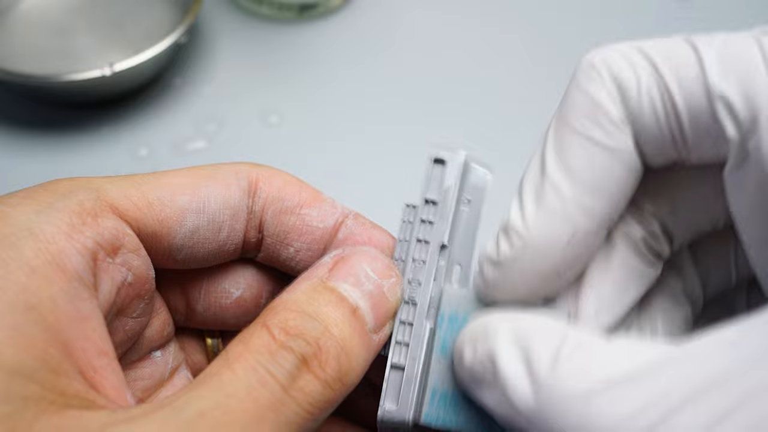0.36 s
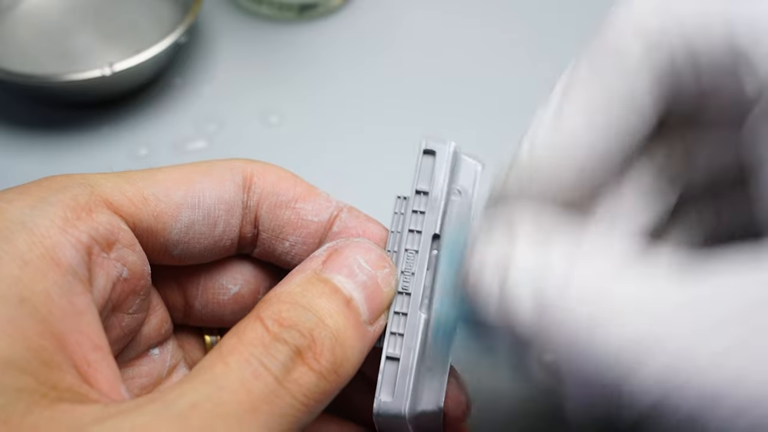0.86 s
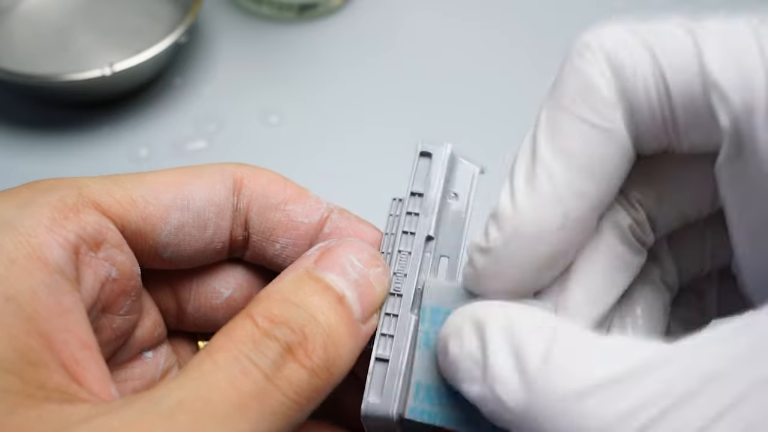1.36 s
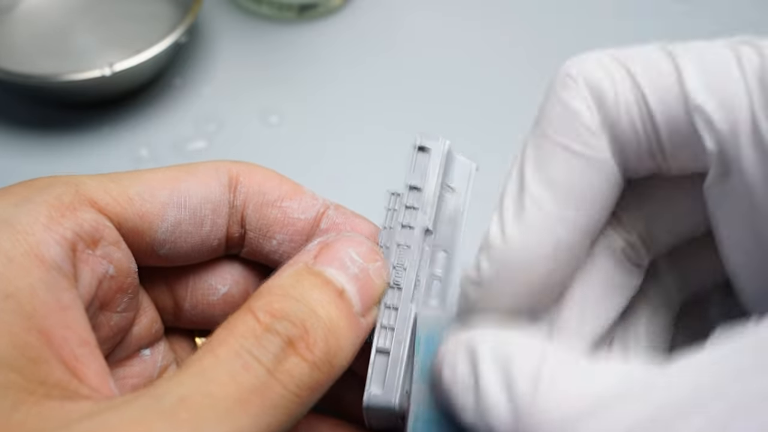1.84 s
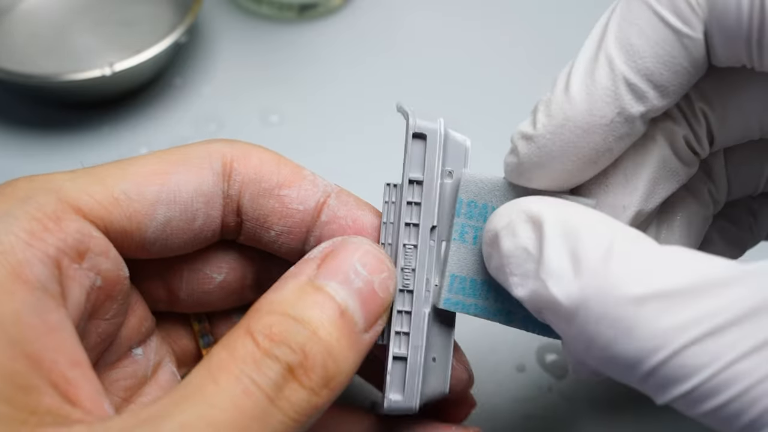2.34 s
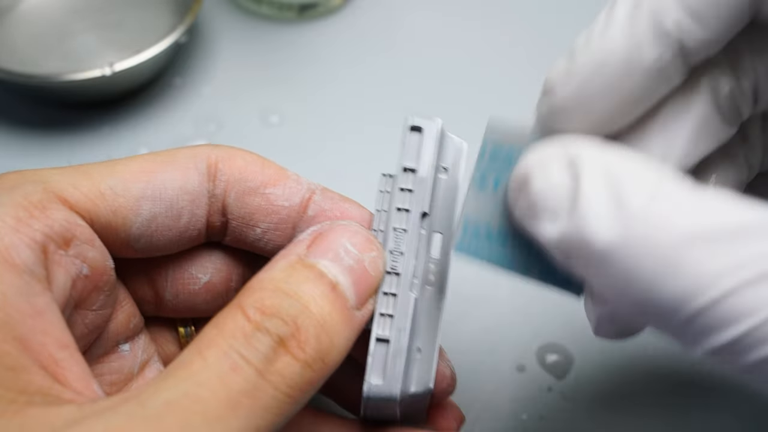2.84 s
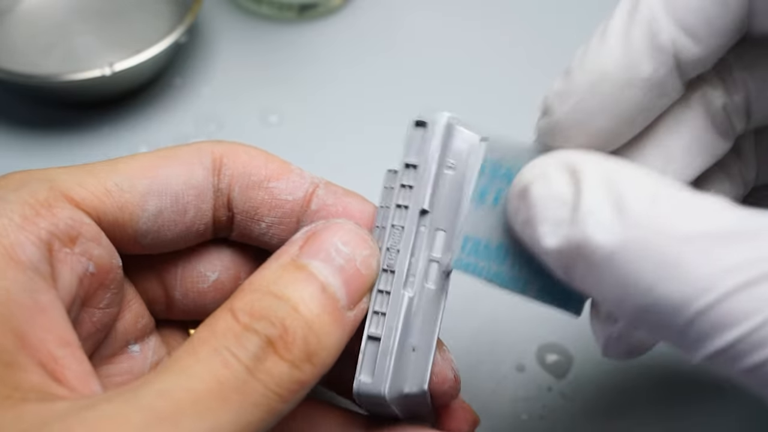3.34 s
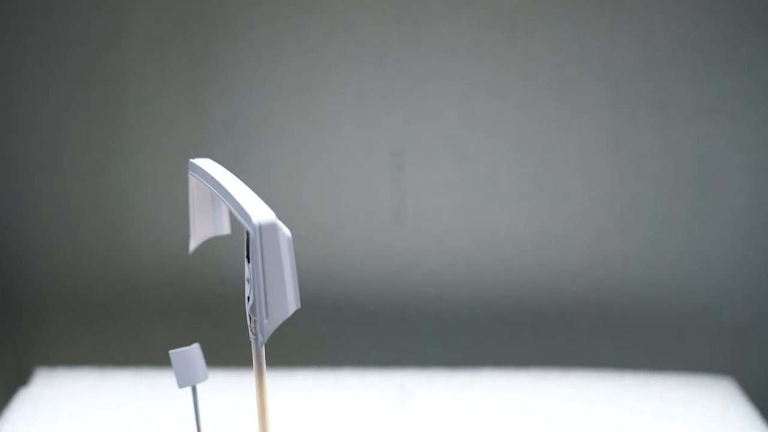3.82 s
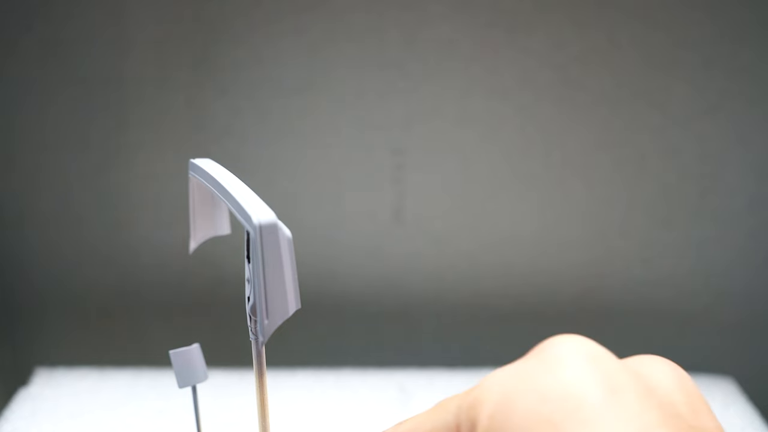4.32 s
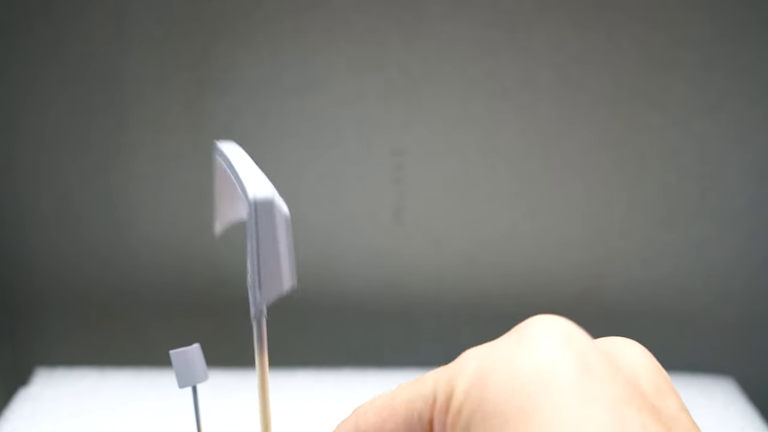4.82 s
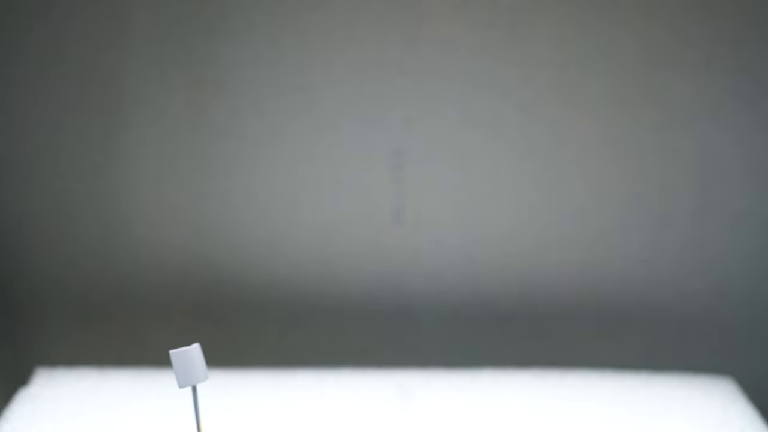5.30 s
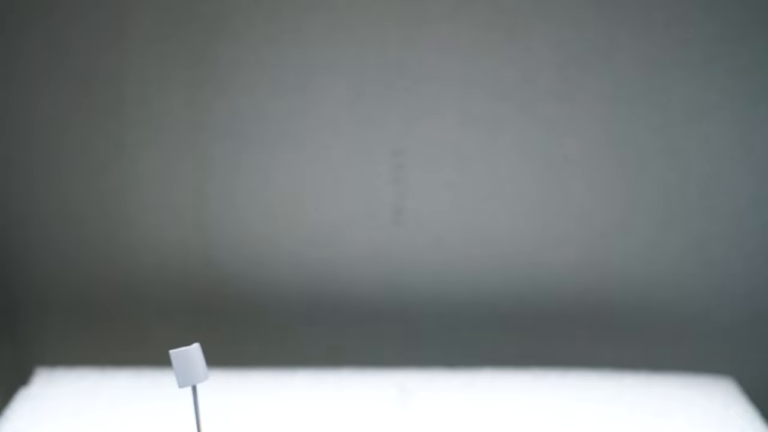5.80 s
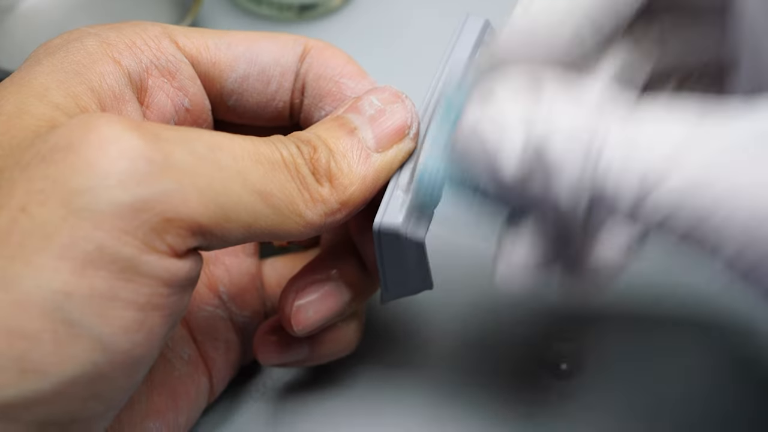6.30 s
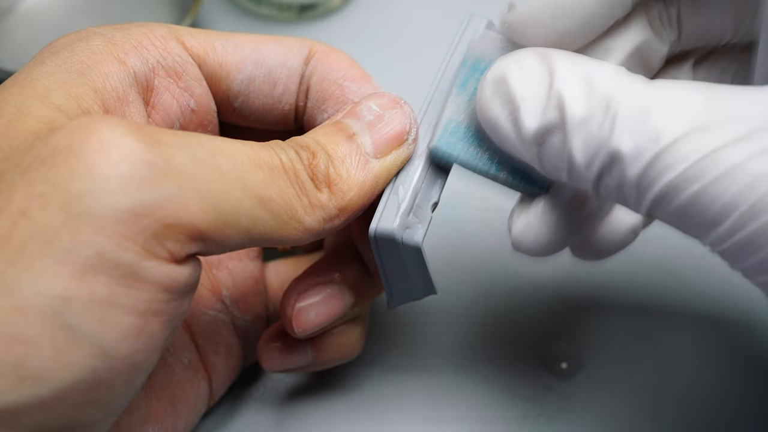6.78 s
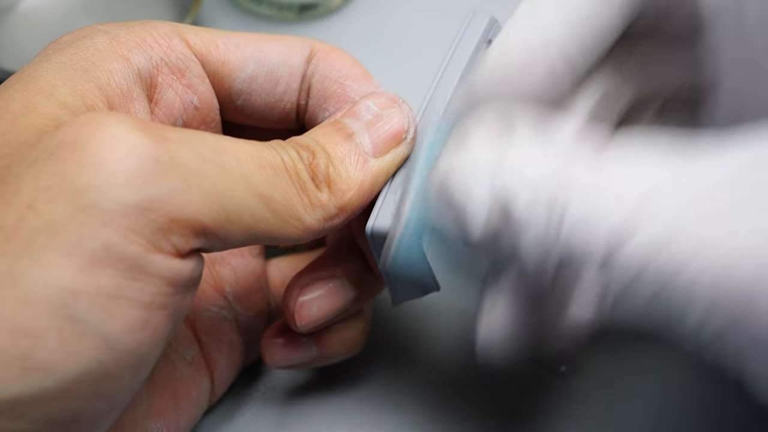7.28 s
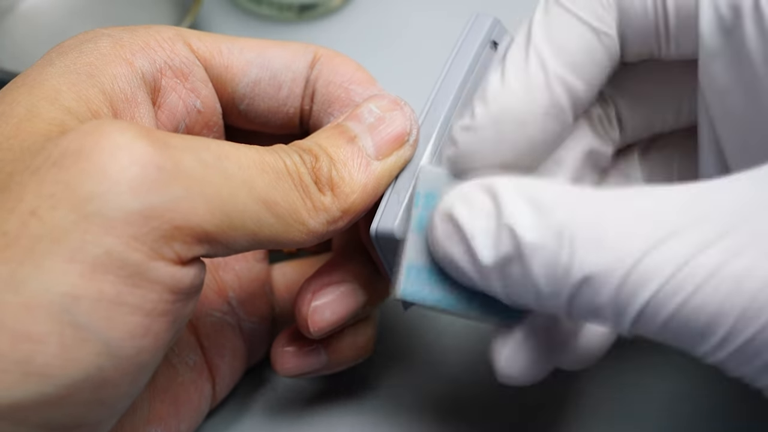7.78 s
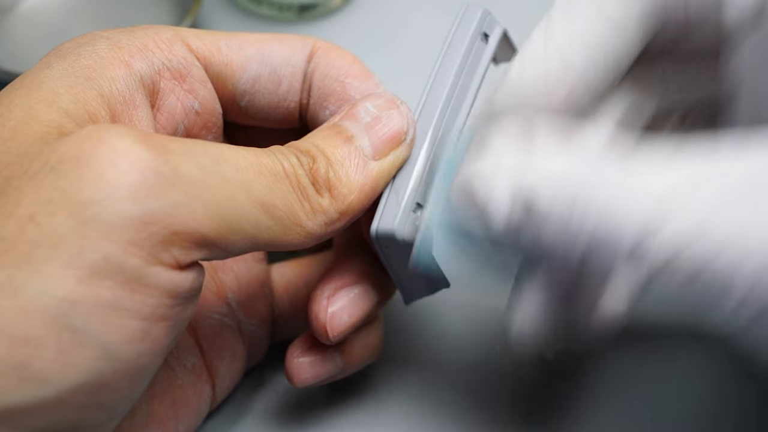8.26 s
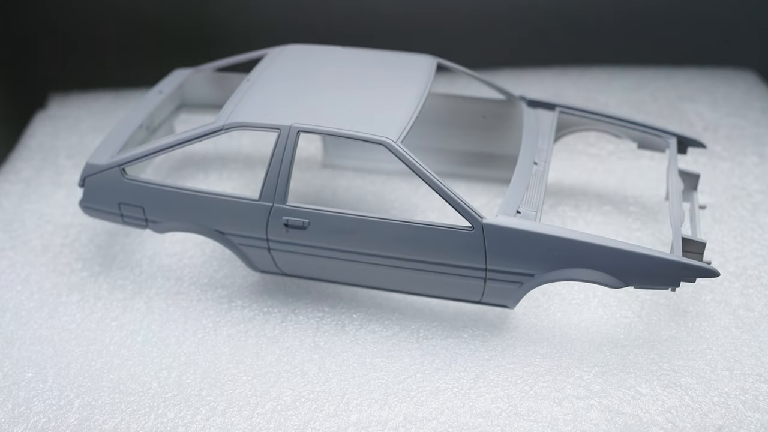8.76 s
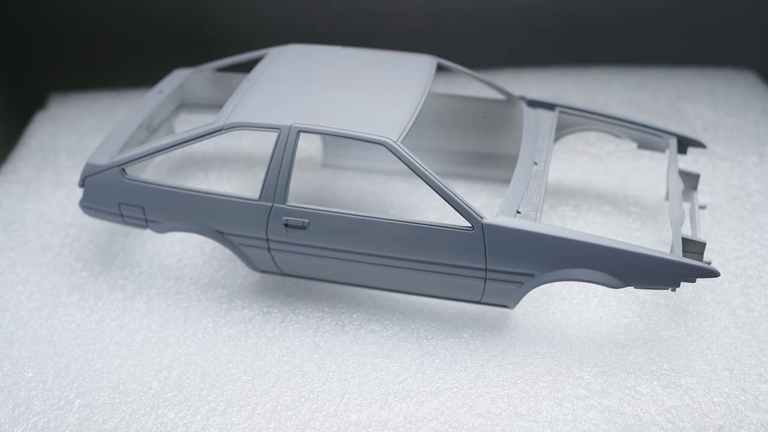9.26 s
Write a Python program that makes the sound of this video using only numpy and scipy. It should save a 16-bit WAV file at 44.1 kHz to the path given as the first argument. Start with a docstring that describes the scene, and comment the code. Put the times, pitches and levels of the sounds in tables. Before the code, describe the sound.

A quiet room with low rumble, wavering hum, distant rush and soft microphone hiss. From 0 to about 2 seconds a pad sands a small hollow plastic part close by, a little left: short, dry, bright rasps, several per second, with a papery hollow tone and small cracks where it snags. Around 2.2 there is a pause with glove rustle, then sparser strokes and sharp snags until 3.4; a faint scuff near 3.8. From 4.35 a stick scrapes and creaks in foam in short pulls, and at 4.8 to 4.95 it slips free in a burst of ringing snaps and chatter. Near quiet until 6.1. Then sanding resumes, louder and quicker, firm strokes about three per second with lighter returns between, strongest around 8 to 8.5, faint whines far behind. It ends near 8.85 with a tiny high tick, soft rustle and slightly stronger distant rush to about 9.4.

```python
"""A quiet, humming room: a stereo microphone close to a small hollow plastic part, right of centre.
A gloved hand rubs a sanding pad over it in two bouts: gritty noise with the ring of the hollow part,
and cracks where the pad snags. Small ticks and soft glove rustles fall around the strokes. Between
the bouts a stick is worked out of a foam block, with scrapes, creaks and ringing slips.
Far rush and faint whines lie behind; the microphone adds its own hiss."""
import sys
import numpy as np
from scipy import signal
from scipy.fft import rfft, irfft, next_fast_len
from scipy.io import wavfile
from scipy.ndimage import uniform_filter1d, map_coordinates

SR = 44100
rng = np.random.default_rng(int(sys.argv[2]) if len(sys.argv) > 2 else 0)


def store_wav(level_fs):
    """Save 16-bit WAV to argv[1]."""
    pcm = np.round(np.clip(np.atleast_2d(level_fs), -1, 1) * 32767)
    wavfile.write(sys.argv[1], SR, pcm.T.astype(np.int16))


def makeup_ratio(level_db):
    """Linear amplitude ratio for a level in decibels (20 dB per factor of ten)."""
    decades = np.asarray(level_db, float) / 20
    return 10 ** decades


N = 413654


def unit(x):
    """Scale to rms 1."""
    return x / np.sqrt(np.mean(x ** 2) + 1e-20)


def along(points, hz):
    """Read (f/Hz, value) points on a log frequency axis."""
    f, v = np.transpose(points)
    return np.interp(np.log(hz + 1), np.log(f + 1), v)


def curve(rows):
    """Read (t/s, value) rows at every sample."""
    return np.interp(np.arange(N) / SR, *np.transpose(rows))


def wobble(rate):
    """A smooth random curve, rate knots a second."""
    knots = rng.standard_normal(int(N * rate / SR) + 4)
    return map_coordinates(knots, [np.arange(N) * rate / SR])


def swell(s, length):
    """A soft hump of height 1, start and length in seconds."""
    return np.sin(np.pi * np.clip((np.arange(N) / SR - s) / length, 0, 1)) ** 2


def filtered(x, response):
    """Multiply the spectrum of x by a response of frequency."""
    m = next_fast_len(N + 8192)
    return irfft(rfft(x, m) * response(np.fft.rfftfreq(m, 1 / SR)), m)[..., :N]


def colour(spectrum):
    """Gain against frequency from (f/Hz, level/dB) points."""
    return lambda hz: makeup_ratio(along(spectrum, hz))


def modes(table):
    """Causal sum of (f/Hz, width/Hz, level/dB) resonances, alternating in sign."""
    return lambda f: sum((-1) ** k * makeup_ratio(db) * 1j * f * w / (c * c - f * f + 1j * f * w)
                         for k, (c, w, db) in enumerate(table))


def spread(pair, alike, lean):
    """Turn two unrelated signals into left and right of given likeness and left-over-right lean in dB."""
    def turn(hz):
        return np.arccos(np.clip(along(alike, hz), 0, 1)) / 2

    mid, side = filtered(pair, lambda hz: np.array([np.cos(turn(hz)), np.sin(turn(hz))]))
    stereo = np.array([mid + side, mid - side])
    return filtered(stereo, lambda hz: makeup_ratio(np.outer([.5, -.5], along(lean, hz))))


def grains(share, size, patchy_db):
    """Two noises with tiny random catches; both favour the same narrow bands for a while."""
    catches = (rng.random(N) < share) * size * rng.random(N)
    z = signal.stft(rng.standard_normal((2, N)) * (1 + catches), nperseg=256)[2]
    field = uniform_filter1d(rng.standard_normal(z.shape[1:]), size=3, axis=0)  # neighbouring bands
    field = uniform_filter1d(field, size=24, axis=1)  # about 70 ms
    return signal.istft(z * makeup_ratio(patchy_db * unit(field)), nperseg=256)[1][:, :N]


def rubbing(rows, entry_db, exit_db, rise, fall, blunt=2):
    """Strength of each rub: bites, swells by entry_db to its fastest point, eases by exit_db, lets go."""
    out, t = np.zeros(N), np.arange(N) / SR
    for s, length, db, fastest in rows:
        near = slice(max(0, round((s - .05) * SR)), round((s + length + .2) * SR))
        u, fastest = t[near] - s, np.clip(fastest, .05, .95)
        w = np.clip(u / length, 0, 1)
        entry = entry_db * abs(1 - w / fastest) ** blunt  # a higher blunt rounds the top
        leave = exit_db * abs((w - fastest) / (1 - fastest)) ** blunt
        slack_db = np.where(w < fastest, entry, leave)
        bite = 1 / (1 + np.exp(-u / rise))
        release = np.exp(-np.maximum(u - length, 0) / fall)
        out[near] += makeup_ratio(db - slack_db) * bite * release
    return out


def banded(hz, width):
    """Two noises confined around one frequency."""
    m = next_fast_len(N)
    f = np.fft.rfftfreq(m, 1 / SR)
    z = rng.standard_normal((2, len(f))) + 1j * rng.standard_normal((2, len(f)))
    return unit(irfft(z / (1 + (2 * (f - hz) / width) ** 2), m)[:, :N])


def wavering(hz, width):
    """A tone whose pitch and strength drift."""
    phase = 2 * np.pi * np.cumsum(hz + width / 2 * wobble(24)) / SR
    return makeup_ratio(1.64 * wobble(16)) * np.sqrt(2) * np.sin(phase) * np.array([[1], [0]])


# colour of the room rumble: [f/Hz, relative level/dB per Hz]
RUMBLE_COLOUR = [(25, 1), (50, -7.5), (145, -8), (200, -11.5), (245, -17.5), (480, -16.5), (950, -30.5),
                 (2500, -24.5), (5000, -68)]
# hum tones before spreading: [f/Hz, pitch drift width/Hz, level/dB]
HUM_TONES = [(90, 20, -71), (173, 6, -66), (205, 10, -75), (304, 12, -78)]
# far rush before spreading: [t/s, level/dB]
RUSH_LEVEL = [(0, -63.5), (5.6, -68), (6.2, -64), (8.75, -64.5), (8.95, -59.5), (9.38, -61)]
# faint far whines: [start t/s, length t/s, f/Hz, level/dB before spreading]
FAR_WHINES = [(6.0, .22, 1220, -62), (6.25, .4, 1200, -64), (7.0, .45, 1220, -62.5), (6.17, .1, 445, -63)]
# likeness of the room left to right: [f/Hz, likeness 0-1]
ROOM_LIKENESS = [(30, 0.36), (60, 0.77), (180, 0.59), (550, 0.72), (1650, 0.21)]
# room, left over right: [f/Hz, level/dB]
ROOM_BALANCE = [(30, 0.5), (180, 1), (1500, -1)]


def room():
    """Coloured noise rumbles, tones waver as hum, banded noise makes the far rush and whines."""
    rumble = unit(filtered(rng.standard_normal((2, N)), colour(RUMBLE_COLOUR)))
    rumble = makeup_ratio(-60.0 + 0.32 * wobble(2.32)) * rumble
    hum = sum(makeup_ratio(db) * wavering(hz, width) for hz, width, db in HUM_TONES)
    far = makeup_ratio(curve(RUSH_LEVEL)) * banded(966, 1230)
    whine = sum(makeup_ratio(db) * np.sqrt(swell(s, length)) * banded(hz, .13 * hz)
                for s, length, hz, db in FAR_WHINES)
    return spread(rumble + hum + far + whine, ROOM_LIKENESS, ROOM_BALANCE)


# colour of the microphone's own noise: [f/Hz, relative level/dB per Hz]
HISS_COLOUR = [(700, -30), (1500, 10), (9000, 6), (15800, 5)]


def microphone_hiss():
    """Each side of the microphone adds unrelated noise, slightly stronger on the right."""
    hiss = unit(filtered(rng.standard_normal((2, N)), colour(HISS_COLOUR)))
    return makeup_ratio(-63.0) * hiss * makeup_ratio(np.array([[-.6], [.6]]))


# pad strokes, firm ones and light returns:
# [start t/s, length t/s, level/dB at the fastest point before flutter, fastest point 0-1]
PAD_STROKES = [(-0.05, 0.072, -44, 0.7), (0.074, 0.12, -44, 0.3), (0.254, 0.14, -43, 0.43),
               (0.457, 0.12, -43, 0.47), (0.633, 0.15, -42.5, 0.16), (0.862, 0.11, -43.5, 0.8),
               (1.019, 0.061, -42, 1), (1.086, 0.054, -44.5, 0.8), (1.206, 0.07, -45.5, 0.7),
               (1.319, 0.11, -44, 0.77), (1.479, 0.063, -42, 0.04), (1.576, 0.088, -44.5, 1),
               (1.709, 0.062, -42.0, 0.23), (1.809, 0.078, -42.5, 0.97), (1.923, 0.076, -41.5, 0),
               (2.527, 0.19, -45, 0.83), (2.774, 0.053, -41.5, 0.16), (3.038, 0.026, -48.5, 1),
               (3.119, 0.096, -44.5, 0.5), (3.251, 0.078, -49.5, 0.3), (6.147, 0.12, -37, 0.16),
               (6.212, 0.073, -45.5, 0.55), (6.302, 0.049, -46, 0.05), (6.42, 0.11, -36.5, 0.42),
               (6.54, 0.038, -51, 0.26), (6.652, 0.086, -38.5, 0.6), (6.75, 0.027, -49.5, 0.05),
               (6.847, 0.1, -39, 0.7), (6.959, 0.14, -48, 0), (7.074, 0.097, -37.5, 0.78),
               (7.178, 0.038, -44.5, 0.4), (7.289, 0.11, -40, 0.65), (7.406, 0.052, -57, 0.05),
               (7.52, 0.1, -40.5, 0.72), (7.628, 0.025, -52.5, 0.3), (7.738, 0.11, -39, 0.61),
               (7.838, 0.068, -45, 0.04), (7.955, 0.098, -34, 0.52), (8.058, 0.021, -47.5, 0.34),
               (8.181, 0.088, -34, 0.54), (8.275, 0.019, -46, 0.3), (8.41, 0.087, -32, 0.38),
               (8.502, 0.02, -46.5, 0.5), (8.59, 0.0059, -43.5, 0.1), (8.612, 0.11, -37.5, 0.23),
               (8.735, 0.018, -49, 0), (8.777, 0.089, -52, 0)]
# how strongly the grip lets the hollow part sound, against the grit: [t/s, level/dB]
BODY_LEVEL = [(0, -8.5), (.55, -10), (.85, -9), (1.25, -7), (1.4, -10), (2.6, -8.5), (3.05, -6), (6.2, -8),
              (6.9, -12), (8.4, -13.5)]
# grit on the first face: [f/Hz, relative level/dB per Hz]
FIRST_FACE = [(1500, -34), (2900, -22), (4500, -12), (6000, -3), (8000, 0), (14500, -2), (15800, -9)]
# grit on the second face: [f/Hz, relative level/dB per Hz]
SECOND_FACE = [(1300, -36), (3000, -4.5), (4240, -8), (4700, -2.5), (6200, 1.5), (8000, -0.5), (10500, 1.5),
               (15800, -6.5)]
# bands of the second face that hard pressure brings out: [f/Hz, width/Hz, relative level/dB]
PRESSED_BANDS = [(3050, 310, -6.5), (5200, 820, -5)]
# modes of the hollow part, also rung by the snags: [f/Hz, width/Hz, relative level/dB]
PART_MODES = [(980, 680, -2), (1587, 118, 9), (1760, 346, 9), (3670, 4800, 9.5)]
# pad and snags, left over right: [f/Hz, level/dB]
PAD_BALANCE = [(1200, -2.5), (4400, -3), (8000, -4)]


def pad():
    """Grit hisses on the face and shakes the hollow part; uneven pressure makes it flutter."""
    turn_s = 5  # the part is turned to its second face
    slow = [row for row in PAD_STROKES if row[0] <= turn_s]
    quick = [row for row in PAD_STROKES if row[0] > turn_s]
    held = rubbing(slow, entry_db=6.5, exit_db=5.0, rise=0.0019, fall=0.012)
    lingers = rubbing(slow, entry_db=0.5, exit_db=3.5, rise=0.0018, fall=0.022)  # body outlasts hiss
    flicked = rubbing(quick, entry_db=8.0, exit_db=18, rise=0.003, fall=0.028, blunt=1.97)
    flutter = makeup_ratio(.7 * wobble(45) + .9 * wobble(160))
    grit = grains(share=.012, size=2.6, patchy_db=2.5)
    first = unit(filtered(grit, colour(FIRST_FACE)))
    second = unit(filtered(grit, colour(SECOND_FACE)))
    hollow = unit(filtered(grains(share=0.005, size=3.5, patchy_db=1.0), modes(PART_MODES)))
    hollow = makeup_ratio(curve(BODY_LEVEL)) * hollow
    rub = held * first + flicked * second + (lingers + flicked) * hollow
    bands = unit(filtered(grains(share=0.0075, size=2.6, patchy_db=4), modes(PRESSED_BANDS)))
    pressure = (flicked / flicked.max()) ** 0.42  # the bands grow faster than the grit
    rub = rub + makeup_ratio(-15) * flicked * pressure * bands
    return spread(flutter * rub, [(1500, 1.0), (15000, 0.51)], PAD_BALANCE)


# small ticks and bumps of pad, glove and desk: [t/s, level/dB before the lean, ring f/Hz]
SMALL_TICKS = [(0.479, -49, 34.7), (2.156, -49, 840), (8.890, -42, 11800)]


def ticks():
    """Each tick or soft bump is a few dying cycles and a brief crack around the same pitch."""
    out, t = np.zeros(N), np.arange(SR // 8) / SR
    for s, db, hz in SMALL_TICKS:
        ring = np.exp(-t * hz / 2.2) * np.sin(2 * np.pi * hz * t)
        edges = [hz / 1.6, min(hz * 3, 15500)]
        band = signal.butter(2, edges, "bandpass", fs=SR, output="sos")
        crack = signal.sosfilt(band, np.exp(-t / .003) * rng.standard_normal(len(t)))
        out[round(s * SR):][:len(t)] += makeup_ratio(db) * (ring + crack)
    return out * makeup_ratio(np.array([[-1.4], [1.4]]))  # right of centre


# the pad snags on an edge and jolts the hollow part:
# [t/s, shudder start level/dB before spreading, shudder decay t/s]
PAD_SNAGS = [(.702, -48, .016), (.942, -46, .003), (.951, -46, .02), (1.071, -44, .003), (1.112, -46, .009),
             (1.212, -50, .035), (2.348, -44, .002), (2.535, -52, .05), (2.788, -46.5, .015),
             (3.125, -39.5, .0025), (3.312, -44, .001), (3.841, -56.5, .02), (7.993, -46, .003),
             (8.213, -45, .003)]


def snags():
    """A push and broad crack, fainter the slower the snag, then a gritty shudder in the part's modes."""
    crack_s, dull_hz, push_db = .0016, 2500, 14  # crack decay; low-pass corner; impulse over shudder
    (shudder, crack, push), t = np.zeros((3, N)), np.arange(SR // 10) / SR
    for s, db, lasts in PAD_SNAGS:
        near = slice(round(s * SR), round(s * SR) + len(t))
        shudder[near] += makeup_ratio(db) * np.exp(-t / lasts)
        crack[near] += makeup_ratio(db) * np.sqrt(crack_s / lasts) * np.exp(-t / crack_s)
        push[near.start] = -makeup_ratio(db + push_db) * min(crack_s / lasts, 1)

    def low(hz):
        resonance = modes(PART_MODES)(hz) + modes([(1100, 1200, 1)])(hz)
        return resonance / (1 + 1j * hz / dull_hz) ** 2

    body = unit(filtered(grains(share=0.011, size=4, patchy_db=2.5), low))
    jolt = filtered(push, low) * [[1], [0]]
    noise = crack * rng.standard_normal((2, N))
    return spread(shudder * body + jolt + noise, [(1500, 0.73)], PAD_BALANCE)


# light brushes of glove and fingers, and in the second bout one light return stroke of the pad: [start t/s,
# length t/s, level/dB before wobble]
LIGHT_BRUSHES = [(2.202, 0.053, -56.5), (2.245, 0.1, -59), (3.453, 0.087, -63), (3.071, 0.055, -52.5),
                 (6.338, 0.13, -59), (8.94, 0.29, -64.5)]


def brushes():
    """Glove and fingers brush softly, and once the pad on a light return stroke: grainy noise with a broad,
    slightly dull hiss."""
    force = sum(makeup_ratio(db) * swell(s, length) for s, length, db in LIGHT_BRUSHES)
    force = force * makeup_ratio(0.59 * wobble(58))
    skin = [(700, -30), (2000, 5.5), (4500, -1.0), (10000, 0.5), (15800, -10)]  # f/Hz, level/dB per Hz
    rustle = unit(filtered(grains(share=0.011, size=2.4, patchy_db=2), colour(skin)))
    return spread(force * rustle, [(3000, 0.58)], [(3000, -4.0)])


# the stick slipping in the foam:
# [start t/s, length t/s, level/dB at the fastest point before judder, fastest point 0-1]
STICK_PULLS = [(4.348, 0.18, -58, .4), (4.546, 0.085, -50, .4), (4.657, 0.09, -50, .22),
               (4.798, 0.19, -49.5, .4)]
# creaks while the stick binds: [start t/s, length t/s, f/Hz, level/dB before judder]
STICK_CREAKS = [(4.35, .18, 2340, -66), (4.55, .08, 1095, -59), (4.543, 0.08, 2150, -57),
                (4.785, 0.14, 1700, -53)]
# sudden slips of the stick: [t/s, level/dB, crack over ring level/dB]
STICK_SNAPS = [(4.8247, -42, -6), (4.851, -42, -12), (4.8715, -40, 0), (4.8836, -33, -4), (4.890, -38, -8),
               (4.9001, -32, -20)]
# modes of stick, foam and the shell on top: [f/Hz, width/Hz, level/dB against the slip]
FOAM_MODES = [(890, 120, -11), (1860, 130, 0), (2220, 130, -2), (2810, 160, -1.5), (5750, 200, -12)]


def stick():
    """The stick scrapes and creaks in the foam; sudden slips crack and ring its modes in varying mixes."""
    cells = [(500, -12.5), (1500, -7.0), (2500, -3.0), (4600, -6), (15800, -16.5)]  # f/Hz, level/dB per Hz
    judder = makeup_ratio(1.6 * wobble(150))
    scrape = unit(filtered(grains(share=0.02, size=3.5, patchy_db=2.6), colour(cells)))
    scrape = rubbing(STICK_PULLS, entry_db=6, exit_db=13, rise=0.004, fall=0.015) * scrape
    creak = sum(makeup_ratio(db) * np.sqrt(swell(s, length)) * banded(hz, hz / 7)
                for s, length, hz, db in STICK_CREAKS)
    # eight slips run together into a chatter as the stick comes free
    start_s, gap_s, chatter_db = 4.908, .0033, -36
    chatter = [(start_s + gap_s * (k + a / 4), chatter_db + 2 * b, -14)
               for k, (a, b) in enumerate(rng.standard_normal((8, 2)))]
    snaps, t = np.zeros((2, N)), np.arange(SR // 20) / SR
    onset = 1 - np.exp(-t / .0004)  # the foam gives, so the ring starts softly
    for s, db, crack_db in STICK_SNAPS + chatter:
        ring = np.zeros(len(t))
        for hz, width, level in FOAM_MODES:
            decay = np.exp(-np.pi * width * t)
            ring += makeup_ratio(level + rng.normal(0, 3)) * decay * onset * np.sin(2 * np.pi * hz * t)
        bright = np.diff(rng.standard_normal((2, len(t) + 1))) / 2
        crack = makeup_ratio(crack_db) * np.exp(-t / .0015) * bright
        snaps[:, round(s * SR):][:, :len(t)] += makeup_ratio(db) * (ring * [[1], [0]] + crack)
    return spread(judder * (scrape + creak) + snaps, [(1000, 0.97), (9000, 0.63)], [(2000, -4.0)])


def scene():
    """All sources as they reach the two sides of the microphone."""
    return room() + pad() + ticks() + snags() + brushes() + stick()


def band_limit(x):
    """A steep low-pass at the top of the band."""
    return signal.sosfilt(signal.butter(12, 16520, fs=SR, output="sos"), x)


def record(dry):
    """The microphone adds its hiss, and nothing passes above 15760 Hz."""
    mix = filtered(dry + microphone_hiss(), lambda hz: hz < 15760)
    return band_limit(mix)


dry = scene()
out = record(dry)
store_wav(out)
```